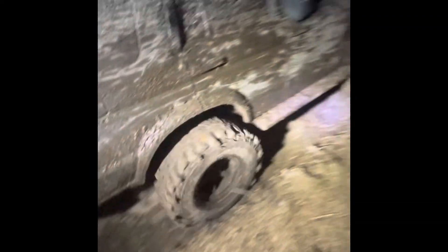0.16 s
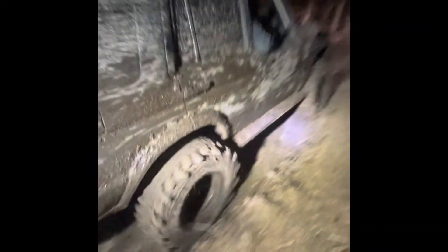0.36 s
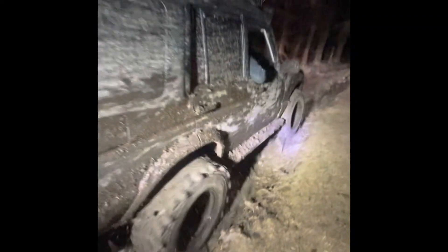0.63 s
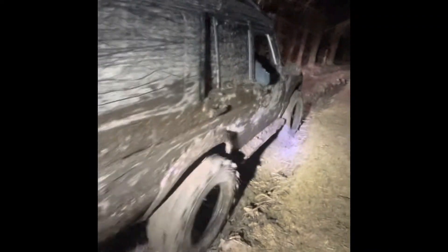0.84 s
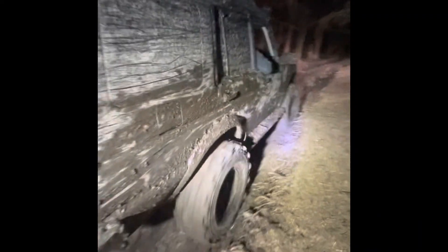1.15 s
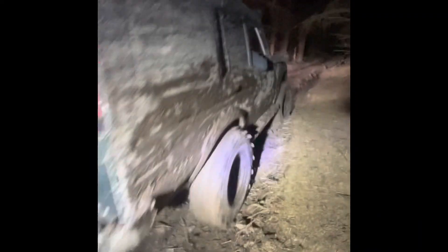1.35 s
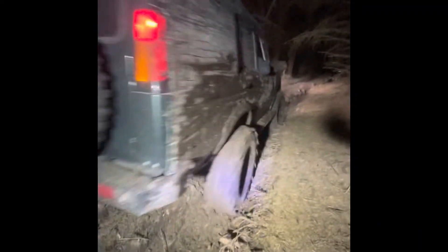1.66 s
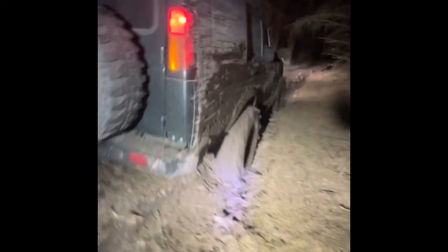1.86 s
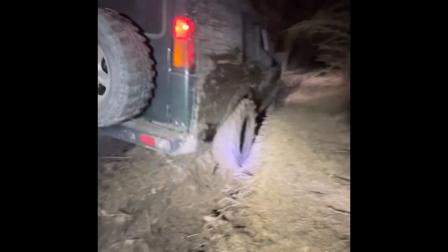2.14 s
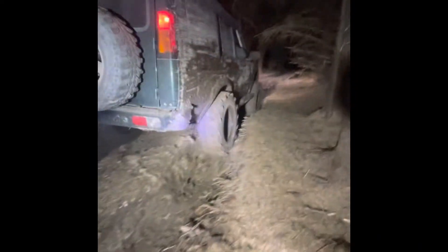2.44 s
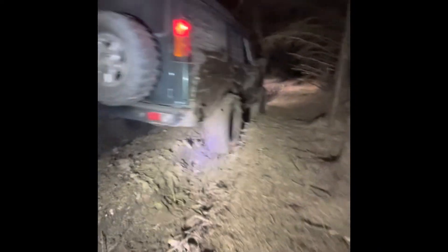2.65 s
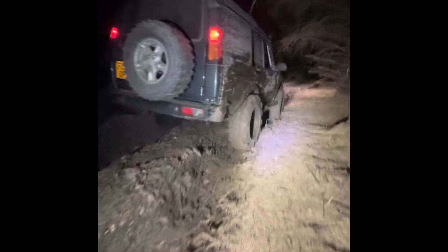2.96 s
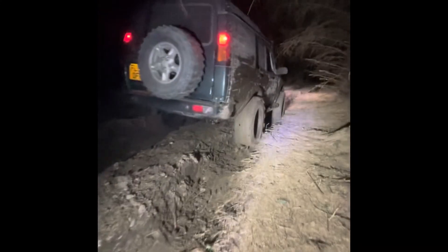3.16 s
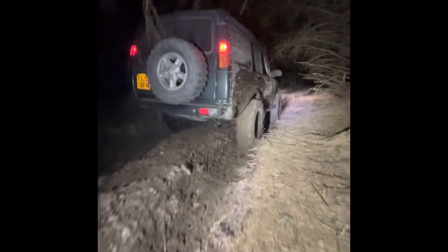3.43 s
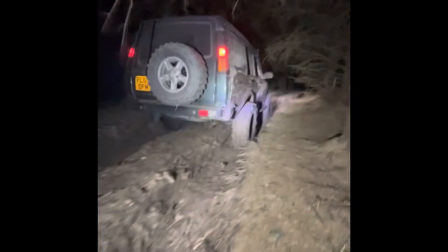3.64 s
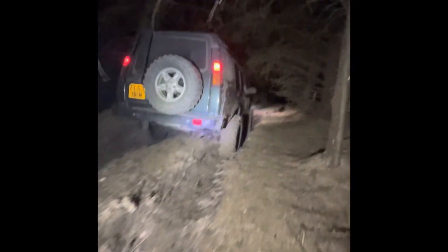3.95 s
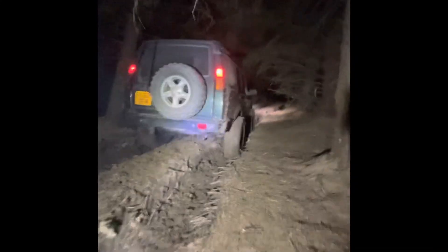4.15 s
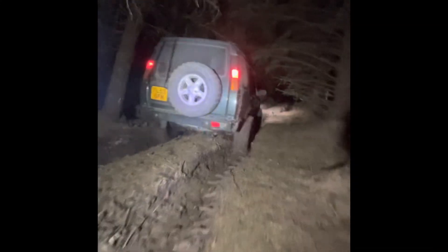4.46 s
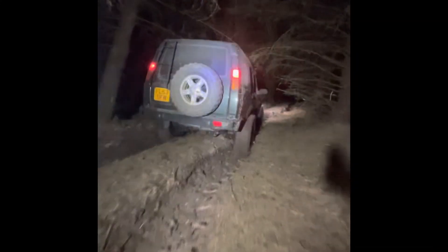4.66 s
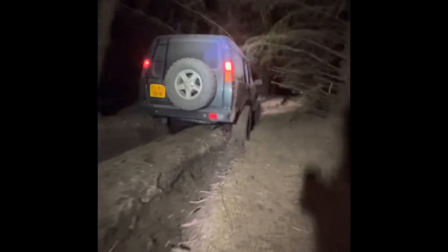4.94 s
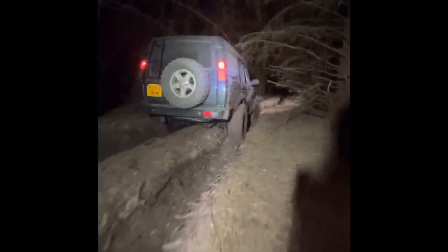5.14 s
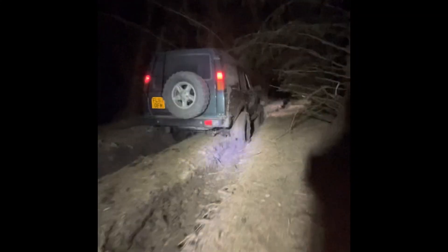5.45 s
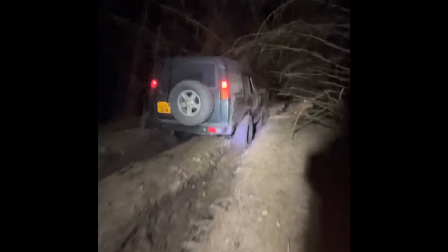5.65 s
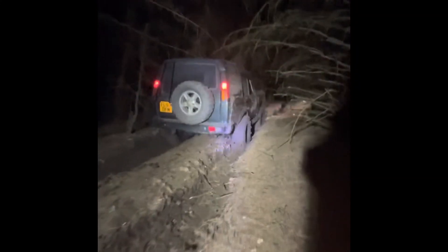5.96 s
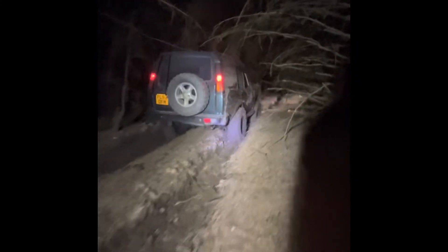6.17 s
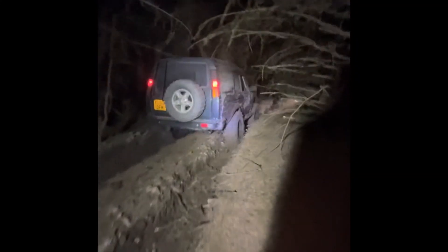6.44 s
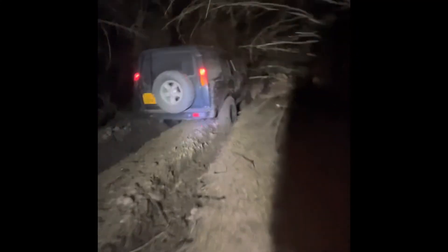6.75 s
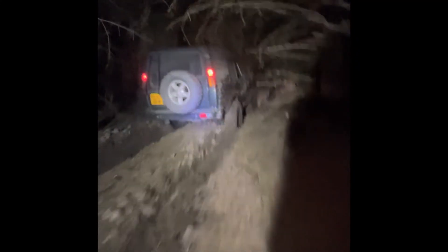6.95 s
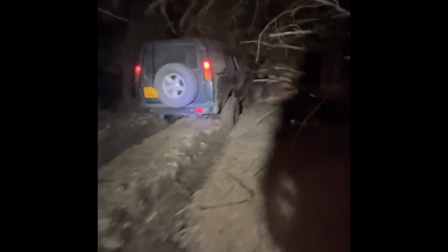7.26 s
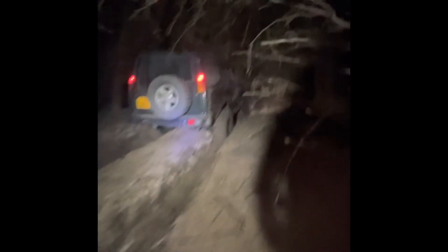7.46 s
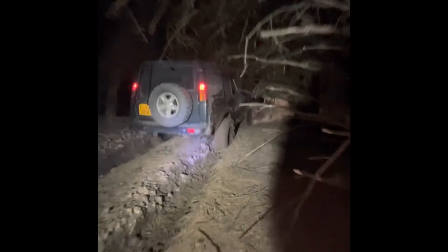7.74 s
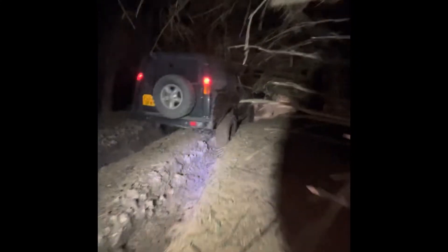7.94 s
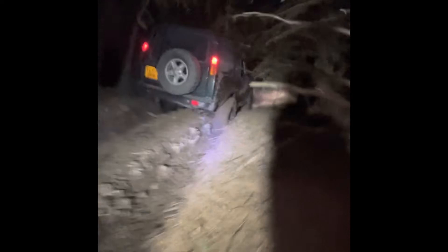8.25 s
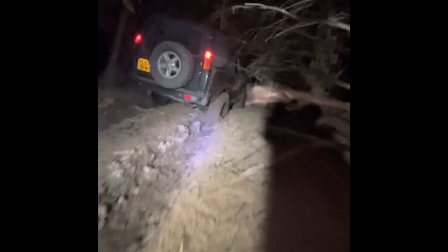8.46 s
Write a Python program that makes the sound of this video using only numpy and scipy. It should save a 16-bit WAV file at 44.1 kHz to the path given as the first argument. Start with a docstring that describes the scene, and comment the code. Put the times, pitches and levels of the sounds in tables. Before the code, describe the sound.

A diesel off-road vehicle passes at arm's length on a muddy forest track at night. Its deep, smooth exhaust boom dominates, with rough gas rush and metallic clatter. Tyres squelch and a twig snaps very loudly early on. The revs sag, recover, climb to a peak as the vehicle draws away, then fall again. Faint creaks follow, and a dry twig cracks beside the handheld microphone near the end.

```python
"""A deep exhaust boom rises and falls as a five-cylinder diesel four-wheel-drive crawls by and away on a forest track.
The boom is a near sine at the firing rate, with hum and whir of belt-driven parts; noise puffed at each firing
makes the gas rush and the panel clatter. Grains of noise squelch under the tyres; knocks and snaps are damped rings.
A two-port handheld microphone hears the front go by at arm's length; trees scatter back a short tail.
Late on, a dry twig cracks right beside the microphone."""
import sys
import numpy as np
from scipy import signal
from scipy.fft import rfft, irfft
from scipy.io import wavfile

SR = 44100
rng = np.random.default_rng(int(sys.argv[2]) if len(sys.argv) > 2 else 0)


def to_wav(s):
    """Save 16-bit WAV."""
    ch = np.atleast_2d(s).T  # columns
    pcm = np.round(np.clip(ch, -1, 1) * 32767)  # PCM
    wavfile.write(sys.argv[1], SR, pcm.astype(np.int16))


N = 379260
TIME_S = np.arange(N) / SR
HZ = np.maximum(np.fft.rfftfreq(N, 1 / SR), 1)


def from_db(db):
    """Decibels to gain."""
    return 10 ** (np.asarray(db) / 20)


def rms_one(x):
    """Scale to unit rms."""
    return x / np.sqrt(np.mean(x ** 2) + 1e-20)


def in_time(rows):
    """Columns of a curve table, one value per sample."""
    start_s, *columns = np.transpose(rows)
    return [np.interp(TIME_S, start_s, column) for column in columns]


def at_hz(points):
    """A (Hz, value) table read at every frequency bin, straight over log frequency."""
    hz, value = np.transpose(points)
    return np.interp(np.log(HZ), np.log(np.maximum(hz, 1)), value)


def colour(x, gain):
    """Multiply the spectrum by a gain per bin."""
    return irfft(rfft(x) * gain, N)


def filtered(x, order, hz, kind):
    """Butterworth filter, "low" or "high"."""
    return signal.sosfilt(signal.butter(order, hz, kind, fs=SR, output="sos"), x)


def drift(rate_hz):
    """Slow random wander of unit rms: noise through two poles at rate_hz."""
    step = 40  # samples between computed points
    r = np.exp(-2 * np.pi * rate_hz * step / SR)
    noise = rng.standard_normal(N // step + 2002)
    slow = signal.lfilter([1], [1, -2 * r, r * r], noise)[2000:]  # settled part
    return np.interp(np.arange(N) / step, np.arange(len(slow)), rms_one(slow))


def ringing(x, hz, width_hz):
    """One resonance, gain 1 on top."""
    r = np.exp(-np.pi * width_hz / SR)
    feedback = [1, -2 * r * np.cos(2 * np.pi * hz / SR), r * r]
    return signal.lfilter((1 - r * r) / 2 * np.array([1, 0, -1]), feedback, x)


# clear higher orders of the engine note, as multiples of the firing rate
OVERTONE_MULTIPLES = [2.8, 3, 3.2, 4, 6, 8]
# their levels: start_s, then one level_db for each multiple
OVERTONES = [(0, -35, -35, -40, -36, -42, -42), (.75, -41, -44.5, -35, -41.5, -48, -37.5),
             (1.25, -50, -34, -45, -38, -60, -50), (1.75, -43, -37.5, -47, -55, -54, -43),
             (2.25, -35, -37, -49, -44.5, -55, -49), (2.75, -44, -51, -52, -33.5, -55, -52),
             (3.1, -41, -39, -35, -35.5, -62, -42), (3.75, -44, -43, -38, -34, -52, -49),
             (4.25, -42, -51, -36.5, -34.5, -59, -47.5), (4.75, -51, -57, -40, -37.5, -51, -56),
             (5.25, -45, -42, -42, -43, -46, -60), (5.5, -47, -46, -44, -43, -33.5, -57),
             (5.8, -52, -49, -41.5, -42, -34.5, -56), (6.25, -40, -49, -39, -44, -46, -57),
             (6.75, -50, -51, -54.5, -43, -67, -47), (7.25, -50, -38, -52, -49, -63, -55),
             (8.6, -48, -38.5, -51, -46, -57, -54)]
# octave overtone of the boom: start_s, level_db
OCTAVE = [(0, -21.5), (.25, -31), (.75, -30), (1.25, -35), (1.7, -42), (1.95, -24.5), (2.3, -24.5),
          (2.85, -27.5), (3.15, -37), (3.45, -31.5), (3.8, -37.5), (4.35, -33), (4.65, -29), (5.3, -27.5),
          (6.15, -25.5), (6.45, -48.5), (7.05, -27), (7.65, -29), (8.6, -30)]
# faint orders between, five firings to an engine cycle: multiple of firing rate, level_db at mean load and revs
ORDERS = [(.6, -54), (.8, -50), (1.2, -52), (1.4, -49), (2.2, -50), (2.4, -50), (2.6, -45), (3.4, -46),
          (3.6, -52), (4.4, -52)]


def exhaust(firings, boom_db, effort_db):
    """The pipe passes the firing rate as a near sine; uneven cylinders add wavering orders between."""
    turn = 2 * np.pi * firings
    out = from_db(boom_db + 0.1 * drift(17.0) + 0.27 * drift(9.4)) * np.sin(turn)
    # the overtones sharpen the pressure crests
    octave_db, = in_time(OCTAVE)
    out -= from_db(octave_db + 2.44 * drift(0.95)) * np.cos(2 * turn + 0.21 * drift(0.71))
    for multiple, level_db in zip(OVERTONE_MULTIPLES, in_time(OVERTONES)):
        out -= from_db(level_db + .8 * drift(1.9)) * np.cos(multiple * turn + 0.15 * drift(1.1))
    for multiple, order_db in ORDERS:
        wobble = 0.42 * drift(1.2) + rng.uniform(0, 2 * np.pi)
        out += from_db(order_db + effort_db + 2.7 * drift(0.98)) * np.sin(multiple * turn + wobble)
    return np.sqrt(2) * out


BELT_LAG_S = 0.0604


def late(firings_per_s):
    """The revs as belt-driven parts follow them, smoothed by a one-pole lag."""
    r = np.exp(-1 / (BELT_LAG_S * SR))
    first = firings_per_s[0]
    return first + signal.lfilter([1 - r], [1, -r], firings_per_s - first)


def line(hz, level_db, waver_db):
    """A thin tone wavering in level and phase."""
    turn = 2 * np.pi * np.cumsum(hz) / SR
    return np.sqrt(2) * from_db(level_db + waver_db * drift(7.4)) * np.sin(turn + 0.3 * drift(6))


# hum of the cooling fan: start_s, level_db
FAN = [(0, -31.5), (.3, -28.5), (.75, -30.5), (1.25, -26.5), (1.85, -25), (2.3, -28.5), (2.8, -29),
       (3.5, -35), (4.3, -32.5), (5.2, -38), (5.7, -38), (6.6, -37.5), (7.2, -29.5), (8.6, -29.5)]
FAN_BASE_HZ, FAN_HZ_PER_FIRING = 52, .92


def fan(firings_per_s):
    """The slipping fan hums a little late behind the revs and follows them only in part."""
    return line(FAN_BASE_HZ + FAN_HZ_PER_FIRING * late(firings_per_s), *in_time(FAN), waver_db=1.2)


# whir of a belt-driven part: start_s, level_db
WHIR = [(0, -38.5), (1.2, -43.5), (1.9, -52.5), (2.3, -41.5), (2.85, -35.5), (3.3, -34), (3.85, -37),
        (4.1, -51), (4.5, -41), (5.2, -36), (5.7, -40), (6.2, -33), (6.6, -41), (7.3, -38.5), (7.8, -45),
        (8.6, -38.5)]
WHIR_PER_FIRING, WHIR_TOP_HZ, WHIR_KNEE = 5.05, 437, 14  # a higher knee bends more abruptly


def whir(firings_per_s):
    """A thin line at five times the boom's pitch, slipping towards a top pitch at high revs."""
    driven_hz = WHIR_PER_FIRING * late(firings_per_s)
    hz = driven_hz / (1 + (driven_hz / WHIR_TOP_HZ) ** WHIR_KNEE) ** (1 / WHIR_KNEE)
    return line(hz, *in_time(WHIR), waver_db=1.4)


# mean firing strength of each cylinder: strength_db
CYLINDER_DB = [0, -4, -1.5, -1, -4]


def firing_puffs(firings, sharp, steady):
    """Two unrelated noises that swell on each firing, by cylinder and by chance, over a steady share."""
    count = firings.astype(int)
    chance_db = 2.9 * rng.standard_normal(count[-1] + 1)
    strength = from_db(np.array(CYLINDER_DB)[count % 5] + chance_db[count])
    return rng.standard_normal((2, N)) * (steady + strength * np.exp(-sharp * (firings % 1)))


# relative spectrum of the exhaust and underbody rush: pitch_hz, density_db
GROWL = [(40, -18.5), (90, -2.5), (130, 1.5), (170, 0), (215, -1.5), (300, -1.5), (420, -6.5), (560, -6),
         (700, -12.5), (900, -24), (1200, -16), (2000, -46)]
# upper part of the rush over its lower part: start_s, level_db
GROWL_TILT = [(0, 3), (.6, 0), (1.2, -1), (2.3, 5), (3.2, 3.5), (4.3, 6), (5.5, -0.5), (6.5, 1), (7.5, 2.5),
              (8.6, -1.5)]
TILT_HZ, RUMBLE_DB = 332, -45


def growl(firings, level_db):
    """Gas rush of the pipe in the low mids, and a faint rumble of air and ground under the boom."""
    rush = rms_one(colour(firing_puffs(firings, sharp=5.5, steady=3.3), from_db(at_hz(GROWL))))
    upper = filtered(rush, 4, TILT_HZ, "high")
    lower = filtered(rush, 4, TILT_HZ, "low")
    rush = lower + from_db(*in_time(GROWL_TILT)) * upper
    rumble = rms_one(colour(rng.standard_normal(N), (HZ > 18) / (1 + (HZ / 70) ** 4)))
    return from_db(level_db + 1.63 * drift(4.2)) * rush + from_db(RUMBLE_DB) * rumble


RASP_HZ, RASP_WIDTH_HZ = 690, 435


def rasp(firings, level_db):
    """Gas tearing at the tailpipe and under the sill: a rough band between growl and clatter."""
    band = ringing(firing_puffs(firings, sharp=1.3, steady=0.98), RASP_HZ, RASP_WIDTH_HZ)
    band = rms_one(ringing(band, RASP_HZ, 2 * RASP_WIDTH_HZ))
    return from_db(level_db + 1.93 * drift(4.0)) * band


# relative spectrum of the knocking block: pitch_hz, density_db
CLATTER = [(700, -13), (1000, -10), (1500, -3), (2000, -0.5), (3200, -6), (4000, -9.5), (6000, -13.5),
           (9000, -18.5), (12000, -34), (13700, -25), (14600, -35.5), (16000, -27.5)]
# panels of block and body: pitch_hz, width_hz, gain_db over the plain knock, front_db added while the front is near
PANELS = [(523, 46, 14, 5), (1217, 51, 4, -7), (1302, 37, 8.5, 2.5), (1378, 98, 10.5, -1.2),
          (1653, 58, 2.5, -0.5), (1787, 36, -11.5, 14.5), (2214, 60, -2, -2), (2535, 88, 3, -5.5),
          (2773, 160, 2.5, -4), (3047, 89, 5, 1), (3382, 51, 4.5, 5.5), (4040, 120, 4.5, -5.5),
          (4334, 40, 11.5, -20), (4760, 23, 5, -3.5)]
FRONT_GONE_S, FRONT_TURN_S = 1, 0.23  # the engine bay turns away and the tail faces the microphone


def clatter(firings, level_db):
    """Combustion knock and valve gear ringing in the panels, each ring wavering on its own."""
    knock = colour(firing_puffs(firings, sharp=4.0, steady=.95), from_db(at_hz(CLATTER)))
    front = 1 / (1 + np.exp((TIME_S - FRONT_GONE_S) / FRONT_TURN_S))
    out = knock * from_db(1.1 * drift(24))
    for hz, width_hz, gain_db, front_db in PANELS:
        panel_db = gain_db + front_db * front + 1.5 * drift(1.5) + 2.8 * drift(6.7)
        out += from_db(panel_db) * ringing(knock, hz, width_hz)
    return from_db(level_db) * rms_one(out)


# tyres in the mud: start_s, level_db before the clumps
TYRES = [(0, -41), (.5, -45), (1.3, -41), (1.9, -45.5), (2.6, -44.5), (3.2, -40.5), (3.5, -52), (4.1, -64),
         (5.5, -48.5), (7.4, -58.5), (8.6, -52.5)]
# clumps of litter crushed or brushed aside: middle_s, length_s, added_db
CLUMPS = [(0.412, 0.077, 8.5), (1.165, 0.03, 12), (1.31, 0.03, 7.5), (1.376, 0.068, 8.5),
          (1.472, 0.074, 7.5), (1.54, .05, 5), (1.616, 0.06, 10), (1.856, 0.05, 5), (2.199, 0.081, 5),
          (2.544, 0.047, 9), (3, 0.062, 12), (3.156, 0.014, 16), (3.2, 0.03, 10.5), (3.292, 0.024, 14),
          (3.453, 0.05, 9.5), (4.978, 0.017, 14), (5.183, 0.029, 9), (5.453, 0.025, 8), (5.87, 0.036, 13),
          (6.078, 0.11, 3.5), (6.509, 0.056, 15), (6.925, 0.054, 9.5), (7.478, 0.12, 16),
          (8.117, 0.04, 12.5), (8.186, 0.021, 11), (8.386, 0.068, 12.5)]
# relative spectrum of mud and litter: pitch_hz, density_db
MUD = [(1500, -18), (2500, 1), (3200, 3.5), (4200, 0.5), (6000, 0), (9000, -5), (13000, -9), (16000, -11)]
GRAINS_PER_S = 900  # before its random swing


def squelch():
    """Uneven grains of mud and litter, each a puff of a millisecond or two, swelling in clumps."""
    level_db, = in_time(TYRES)
    clump_db = sum(added_db * np.exp(-(2 * (TIME_S - middle_s) / length_s) ** 4)
                   for middle_s, length_s, added_db in CLUMPS)
    born = rng.random(N) < GRAINS_PER_S * from_db(2.5 * drift(25)) / SR
    sizes = from_db(0.75 * np.minimum(rng.exponential(1, N), 4))
    envelope = signal.lfilter([1], [1, -.975], born * sizes + 0.013)  # grains over a faint steady floor
    puffs = envelope * rng.standard_normal((2, N))
    return from_db(level_db + clump_db) * rms_one(colour(puffs, from_db(at_hz(MUD))))


def place(out, start_s, peak_db, blow):
    """Add one blow at its start, scaled to its peak level."""
    at = round(start_s * SR)
    out[at:at + len(blow)] += from_db(peak_db) * blow / np.abs(blow).max()


# dull knocks of the chassis and of wood: start_s, peak_db, first_hz, last_hz
KNOCKS = [(.171, -20, 860, 593), (.379, -18.5, 1850, 990), (.392, -18, 1490, 690), (.413, -19.5, 1510, 800),
          (0.474, -27, 1790, 1300), (.51, -22.5, 1090, 850), (.539, -23, 1700, 610), (.701, -21, 498, 329),
          (.7705, -22, 502, 328), (1.379, -21, 2420, 890), (1.5203, -21.5, 1790, 800),
          (1.5462, -19.5, 1590, 700), (2.509, -17.5, 2570, 885), (2.515, -28, 2000, 1300),
          (3.1897, -20, 3400, 1890), (3.194, -15.5, 1215, 620), (5.9783, -24.5, 3000, 2630),
          (5.9796, -18, 1980, 1740), (6.6342, -21.5, 2010, 590), (8.0837, -18, 3900, 3700),
          (8.0834, -28.5, 2500, 1700), (8.084, -19.5, 607, 420), (8.0846, -23, 1190, 784),
          (8.187, -25.5, 2800, 2300)]
KNOCK_CYCLES, KNOCK_SAG_S, KNOCK_RISE_S = 19.0, .0012, .0003  # cycles to die by 60 dB; pitch sag; rise


def knocks():
    """Each knock is a short ring whose pitch sags from a sharp tick to a dull body."""
    t, out = np.arange(SR // 20) / SR, np.zeros(N + SR)
    for start_s, peak_db, first_hz, last_hz in KNOCKS:
        turns = last_hz * t + (first_hz - last_hz) * KNOCK_SAG_S * (1 - np.exp(-t / KNOCK_SAG_S))
        decay = from_db(-60 * turns / KNOCK_CYCLES)
        blow = -np.sin(2 * np.pi * turns) * decay * (1 - np.exp(-t / KNOCK_RISE_S))
        place(out, start_s, peak_db, blow)
    return out[:N]


def blows(table, cycles, noisy, rise_s, upper, lowest_hz):
    """Each blow: a quickly damped ring at its pitch plus a share of dying noise with its own brightness."""
    t, out = np.arange(SR // 10) / SR, np.zeros(N + SR)
    for start_s, peak_db, hz, bright_db in table:
        t60 = cycles / hz  # for the noise; the ring dies faster
        burst = filtered(rng.standard_normal(len(t)), 2, lowest_hz, "high")
        low = filtered(burst, 4, 11000, "low")
        noise = low + 1.8 * ringing(low, hz, 0.33 * hz) + from_db(bright_db + 19.0) * (burst - low)
        modes = np.sin(2 * np.pi * hz * t) + upper * np.sin(2 * np.pi * 1.5 * hz * t)
        ring = modes * from_db(-30 * t / t60)
        blow = noisy * rms_one(noise) + (1 - noisy) * ring
        blow *= from_db(-60 * t / t60) * (1 - np.exp(-t / rise_s))
        place(out, start_s, peak_db, blow)
    return out[:N]


# twigs and stones under the tyres: start_s, peak_db, ring_hz, brightness_db (relative, lifted by 19 dB)
SNAPS = [(0.4275, -26, 3190, -23), (.905, -30, 6000, 0), (0.977, -15.5, 2660, -51), (1.156, 0, 2900, -9.5),
         (1.1762, -13, 3150, -10), (1.276, -20, 3300, -30), (1.289, -21, 3500, -10),
         (1.3473, -19.5, 3200, -17), (1.5953, -18, 4060, -21), (1.6194, -23, 3260, -8),
         (1.641, -17.5, 3440, -8), (1.6831, -21.5, 2750, -30), (2.9733, -19, 5950, -15),
         (2.9918, -10.5, 3960, -20.5), (3.0108, -16, 6500, -22), (3.0285, -20, 6800, -20),
         (3.1515, -13.5, 3000, -29), (3.1895, -15, 3700, -3), (3.2835, -16, 4300, -32),
         (3.2868, -17, 3000, -19), (3.2905, -15, 3100, -29), (4.669, -29, 3440, -12),
         (4.89, -24, 3300, -22), (5.1108, -23, 4000, -36), (5.874, -30, 2830, -38),
         (8.3647, -33, 3030, -14)]


def snaps():
    """Twigs snap and stones jump: mostly noise around a short ring, with a weak second mode."""
    return blows(SNAPS, cycles=36, noisy=0.66, rise_s=0.0015, upper=0.23, lowest_hz=2600)


# creaking springs and ringing panels as the body twists: start_s, length_s, pitch_hz, level_db before taper and flicker
SQUEAKS = [(.47, 0.057, 824, -34), (.47, .1, 600, -37), (.6, 0.11, 640, -34), (.73, .1, 598, -36),
           (.8, 0.093, 763, -38), (1.827, 0.05, 4000, -37), (1.828, 0.042, 5900, -41),
           (2.147, 0.049, 3960, -39), (2.149, .04, 5900, -46), (2.255, 0.04, 4100, -36.5),
           (2.515, 0.051, 4150, -31), (2.52, .045, 6100, -43), (2.735, 0.063, 4100, -35.5),
           (3.058, 0.024, 4050, -32.5), (3.55, 1.55, 1716, -46), (3.65, 0.32, 3160, -43),
           (4.3, 0.31, 1265, -45), (4.48, 0.072, 1710, -43), (4.718, 0.22, 1384, -39),
           (4.91, 0.071, 1720, -43), (4.9, 0.28, 1420, -45), (4.723, 0.38, 3430, -46.5),
           (3.5, 2.0, 4850, -57), (4.3, 1.8, 534.7, -38), (5.26, .3, 1704, -36), (5.246, 0.21, 1260, -43),
           (5.3, 0.26, 1400, -47), (5.33, .1, 2970, -46), (5.5, 0.11, 2870, -39), (5.4, 0.17, 2160, -54),
           (5.33, 0.37, 2613, -43), (5.847, 0.14, 2590, -38), (6.064, 0.051, 6850, -45),
           (6.147, 1.1, 1220, -48.5), (7.2, 1.3, 534.4, -43.5)]
SQUEAK_SPREAD, SQUEAK_FLUTTER = 0.017, 28  # width in Hz = spread x pitch + flutter / length
SQUEAK_CLEAR, SQUEAK_WAVER = .8, .011  # clear tone over the noise; relative wander of its pitch


def squeaks():
    """A wandering tone in narrow, fluttering noise under a smooth swell."""
    out, wander = np.zeros((2, N)), 1 + SQUEAK_WAVER * drift(30)
    flicker = from_db(1.5 * drift(18))
    for start_s, length_s, hz, level_db in SQUEAKS:
        width_hz = SQUEAK_SPREAD * hz + SQUEAK_FLUTTER / length_s
        at, size = round(start_s * SR), round(length_s * SR)
        noise = rng.standard_normal((2, size + SR // 10))  # extra lead lets the ringing settle
        narrow = ringing(ringing(noise, hz, width_hz), hz, width_hz)[:, -size:]
        turns = hz * np.cumsum(wander[at:at + size]) / SR
        tone = np.sqrt(2) * np.sin(2 * np.pi * turns) * [[1], [0]]  # only in the common part
        squeak = rms_one(rms_one(narrow) + SQUEAK_CLEAR * tone)
        out[:, at:at + size] += from_db(level_db) * squeak * signal.windows.tukey(size, .6)
    return flicker * out


# a dry twig beside the microphone: start_s, peak_db, ring_hz, brightness_db (relative, lifted by 19 dB)
CRACKS = [(8.0757, -35, 5930, -31), (8.0833, -6, 5770, -31), (8.0904, -27, 5860, -28)]


def cracks():
    """The twig cracks square on to both ports: a clearer ring with a stronger second mode."""
    return blows(CRACKS, cycles=32, noisy=0.22, rise_s=0.00063, upper=0.53, lowest_hz=3000)


TREES_DB, TREES_T60_S = -16, .1


def trees(x):
    """Trunks scatter a short, faint tail of the sharp sounds, another one to each port."""
    t = np.arange(SR // 4) / SR
    tails = rng.standard_normal((2, len(t))) * from_db(-60 * t / TREES_T60_S)
    tails /= np.sqrt(np.sum(tails ** 2, axis=1, keepdims=True))
    return from_db(TREES_DB) * signal.fftconvolve(x[None], tails, axes=1)[:, :N]


SNAP_BOUNCE_DB, SNAP_BOUNCE_S = -12, 0.00065


def ground_bounce(snapping):
    """Each snap also bounces off the ground, square on to both ports."""
    return from_db(SNAP_BOUNCE_DB) * np.roll(snapping, round(SNAP_BOUNCE_S * SR))


# share of spread-out noise common to both ports: pitch_hz, share 0-1
LIKENESS = [(300, 1), (700, 0.79), (1200, 0.91), (1900, 1), (2500, 0.96), (3200, 0.66), (4600, 0),
            (6000, 0.6), (8500, 0.67), (9500, 0.79), (10300, 1), (11300, 1), (12300, 0.8), (13500, .75),
            (14300, 0.91)]
# left port over right: pitch_hz, level_db
PORT_DB = [(60, .3), (120, 1.2), (200, 2.2), (400, 4.2), (650, 6.5), (1200, 3.5), (2000, 0), (3200, -2.2),
           (4300, 1), (7000, -1), (10000, 0)]
# left port ahead of right: pitch_hz, phase_rad
PORT_PHASE = [(70, .08), (130, .03), (300, 0), (1100, -.3), (1900, 0), (3300, .7), (5500, .8), (7000, 1.4),
              (8500, 2.7), (10500, 3.14), (11500, 3.3), (12500, 4.5), (13500, 5.6), (14500, 6.28)]


def two_ports(spread, points):
    """Point sources reach both ports alike, spread-out noise partly; the ports differ in level and phase."""
    common, apart = spread
    alike = at_hz(LIKENESS)
    common = colour(common, np.sqrt((1 + alike) / 2)) + points
    apart = colour(apart, np.sqrt((1 - alike) / 2))
    step = from_db(at_hz(PORT_DB) / 2) * np.exp(.5j * at_hz(PORT_PHASE))
    return np.array([colour(common + apart, step), colour(common - apart, 1 / step)])


# the engine: start_s, firings_per_s, boom_db
ENGINE = [(0, 66, -7), (.2, 74.6, -7.9), (.3, 75.7, -8.1), (.5, 73.6, -9.6), (.65, 74, -9.1),
          (.8, 70.9, -9.7), (1.08, 64.6, -9.4), (1.3, 55.4, -11), (1.4, 54.4, -10), (1.5, 56.6, -9.5),
          (1.6, 55.7, -11.1), (1.8, 50.4, -12.5), (1.9, 50.8, -11.9), (2.1, 59.8, -8.3), (2.22, 63, -8.5),
          (2.45, 61.9, -9.4), (2.65, 64.9, -8.5), (2.9, 70, -9), (3, 71, -9.9), (3.15, 70.6, -10.5),
          (3.78, 74.8, -11.6), (4.1, 70.8, -11.2), (4.45, 75.6, -10.5), (4.8, 76.7, -10.5),
          (4.9, 78.4, -10.8), (5.02, 81.3, -12.6), (5.15, 81.4, -14.1), (5.28, 81.6, -12.6),
          (5.4, 84.9, -13), (5.58, 89.8, -17), (5.72, 89.8, -17.6), (6, 86.6, -19.8), (6.1, 83.2, -18.6),
          (6.2, 77, -16.3), (6.3, 73.8, -14.3), (6.65, 68.7, -13.7), (6.9, 64.2, -11.5), (7.3, 55.9, -11.8),
          (7.4, 56.6, -11.5), (7.65, 61.9, -10.9), (8, 61.6, -10.6), (8.6, 60.3, -10.5)]
# working noise, load and distance together: start_s, exhaust_side_db (used about its mean), clatter_db
LOAD = [(0.0, -27, -32), (0.36, -25.5, -29.5), (0.55, -24, -31), (0.91, -24.5, -34), (1.17, -29, -36),
        (1.53, -28, -35.5), (1.8, -33.5, -38), (2.87, -28.5, -33.5), (2.99, -29, -35.5), (3.19, -27.5, -34),
        (3.45, -31, -35.5), (3.81, -29.5, -34.5), (4.09, -31.5, -36.5), (4.76, -31.5, -35.5),
        (5.13, -28.5, -35), (5.48, -28, -33), (5.63, -28.5, -35.5), (5.87, -28, -36.5), (6.03, -28, -39),
        (6.73, -33, -41), (7.19, -35, -40), (7.5, -34.5, -38.5), (8.26, -33, -41.5), (8.6, -33, -41)]
GROWL_DB, GROWL_FOLLOWS = -33, 1  # level at mean load; share of the load's swing
RASP_DB, RASP_FOLLOWS = -42.5, 1.42  # likewise, away from the pass
PASS_S, PASS_LENGTH_S, PASS_RASP_DB = 0.33, 0.18, 5  # the front goes by at arm's length


def scene():
    """One set of revs drives tones and engine noise; tyres, body and wood join in at the two ports."""
    firings_per_s, boom_db = in_time(ENGINE)
    load_db, clatter_db = in_time(LOAD)
    swing_db = load_db - load_db.mean()
    firings = np.cumsum(firings_per_s) / SR
    growl_swing_db = GROWL_FOLLOWS * swing_db
    effort_db = growl_swing_db + 0.38 * (firings_per_s - firings_per_s.mean())
    tones = exhaust(firings, boom_db, effort_db) + fan(firings_per_s) + whir(firings_per_s)

    near = np.exp(-(2 * (TIME_S - PASS_S) / PASS_LENGTH_S) ** 2)
    rasp_db = RASP_DB + RASP_FOLLOWS * swing_db + PASS_RASP_DB * near
    engine = growl(firings, GROWL_DB + growl_swing_db) + rasp(firings, rasp_db) + clatter(firings, clatter_db)
    spread = engine + squelch() + squeaks()

    snapping, cracking = snaps(), cracks()
    sharp = snapping + knocks()
    ports = two_ports(spread, tones + sharp)
    return ports + cracking + ground_bounce(snapping) + trees(sharp + cracking)


CUTOFF_HZ = 16400


def record(dry):
    """The highest peaks are rounded, the top is cut."""
    top = .95
    rounded = dry / (1 + np.abs(dry / top) ** 8) ** (1 / 8)
    return signal.sosfilt(signal.cheby2(12, 70, CUTOFF_HZ, fs=SR, output="sos"), rounded)


dry = scene()
out = record(dry)
to_wav(out)
```